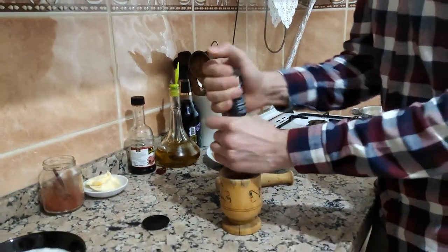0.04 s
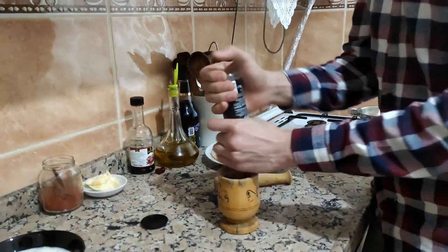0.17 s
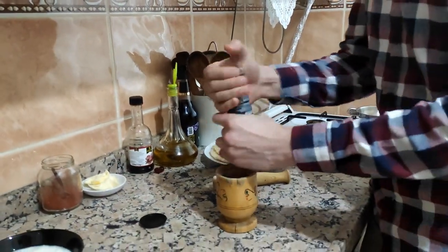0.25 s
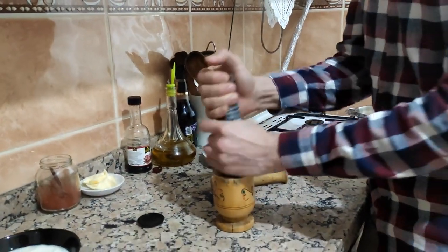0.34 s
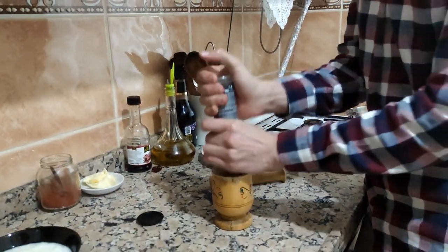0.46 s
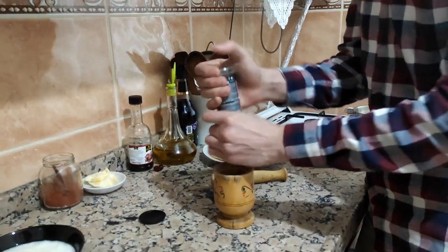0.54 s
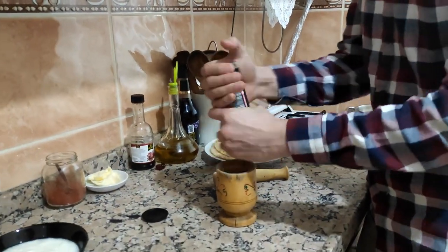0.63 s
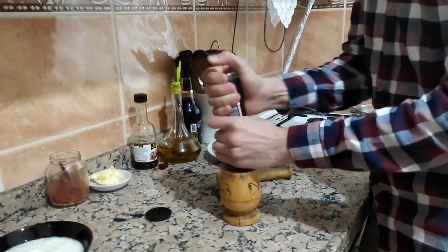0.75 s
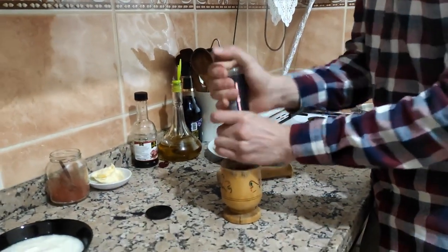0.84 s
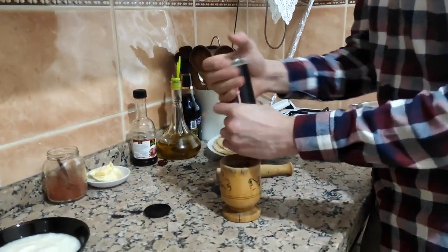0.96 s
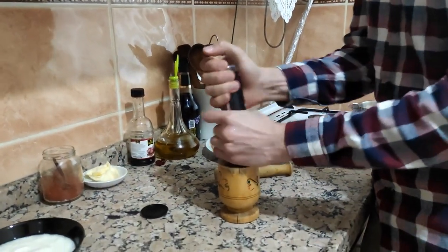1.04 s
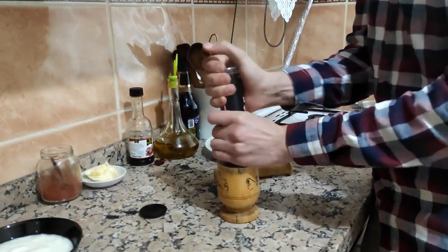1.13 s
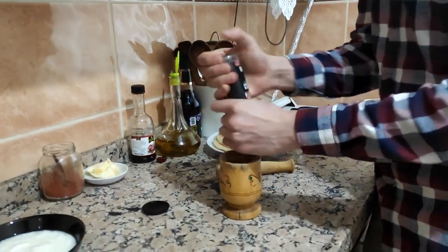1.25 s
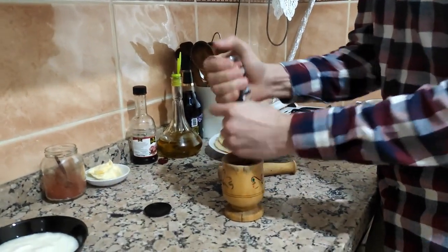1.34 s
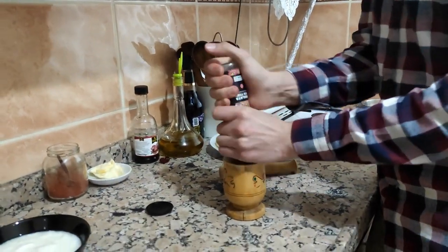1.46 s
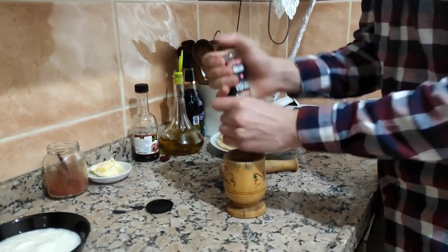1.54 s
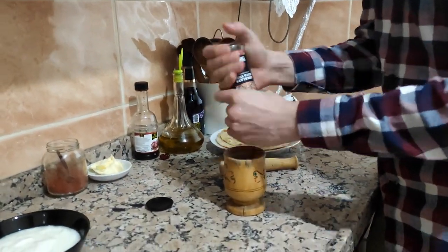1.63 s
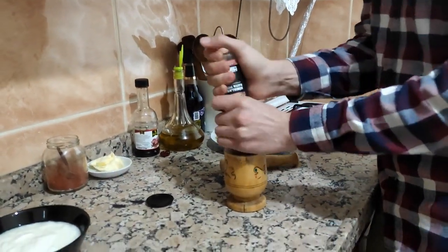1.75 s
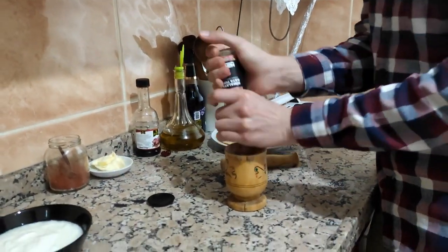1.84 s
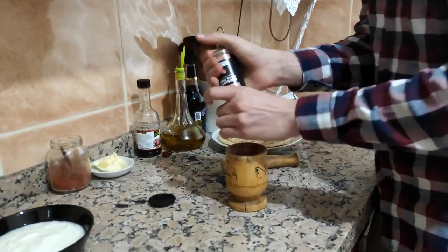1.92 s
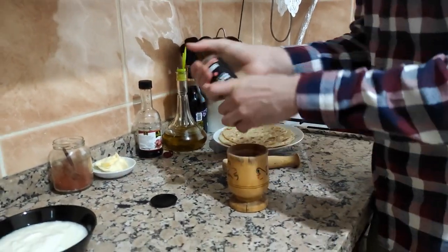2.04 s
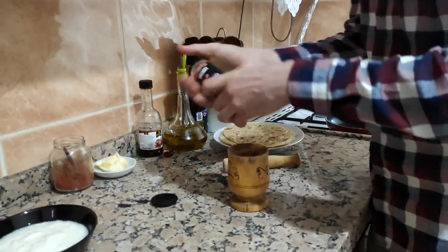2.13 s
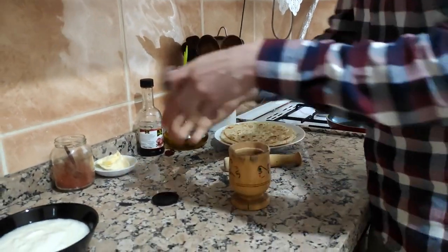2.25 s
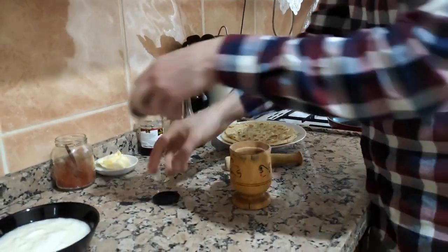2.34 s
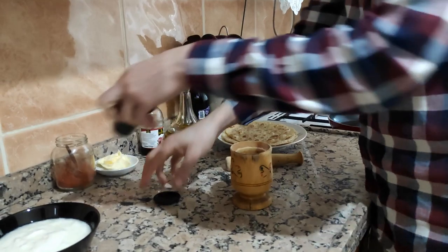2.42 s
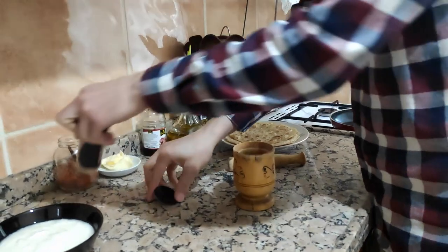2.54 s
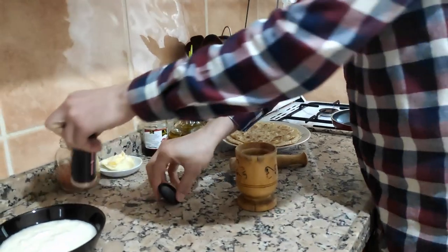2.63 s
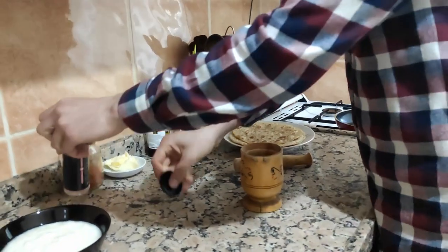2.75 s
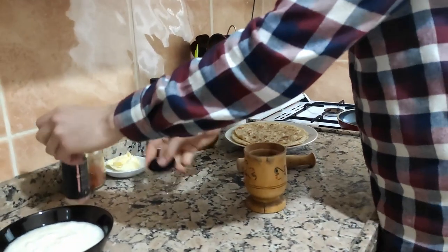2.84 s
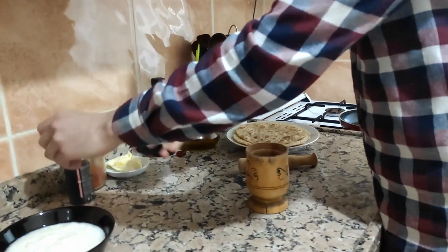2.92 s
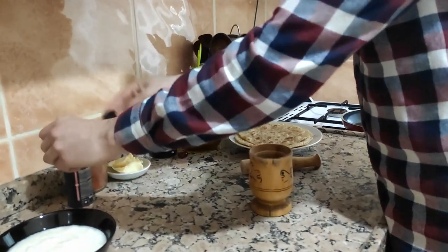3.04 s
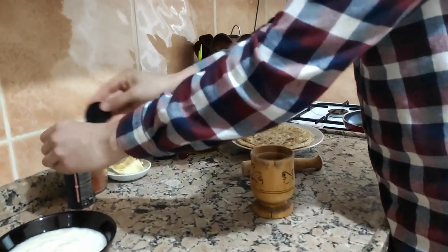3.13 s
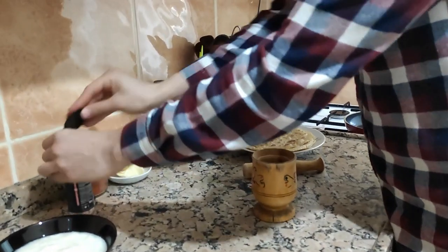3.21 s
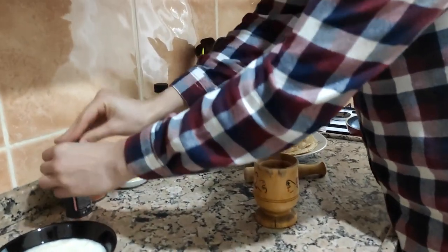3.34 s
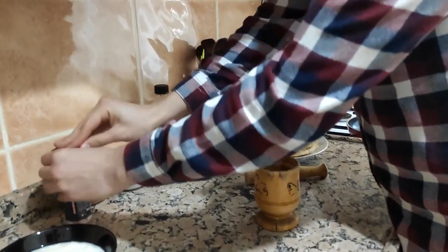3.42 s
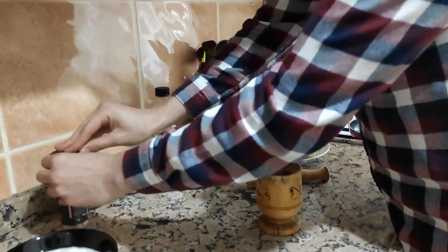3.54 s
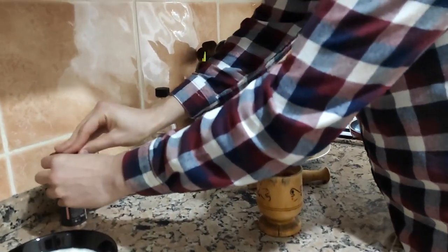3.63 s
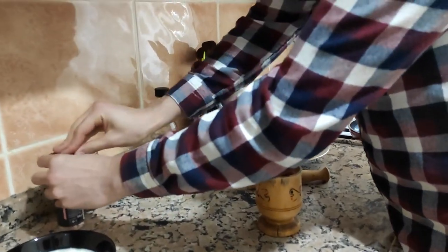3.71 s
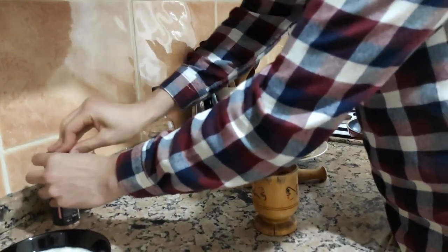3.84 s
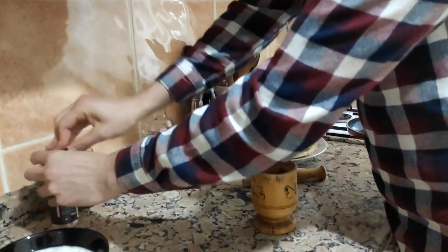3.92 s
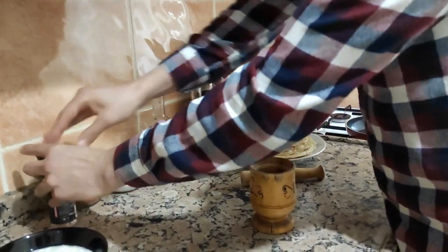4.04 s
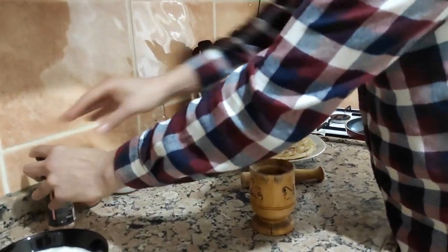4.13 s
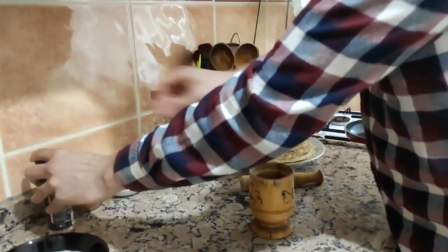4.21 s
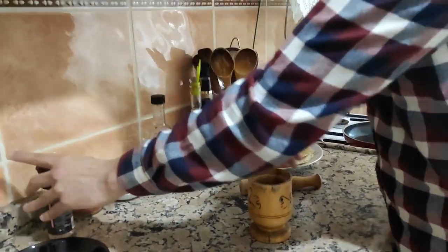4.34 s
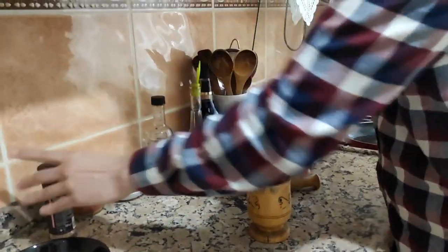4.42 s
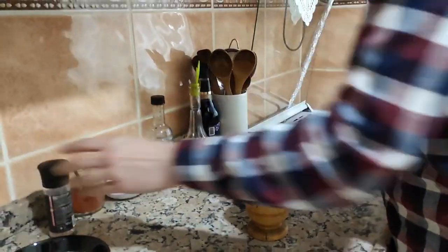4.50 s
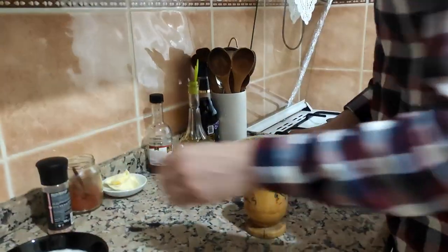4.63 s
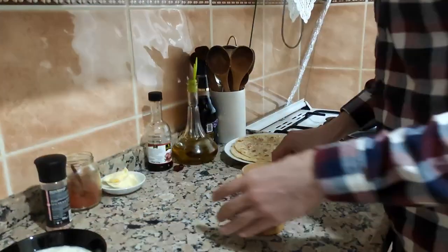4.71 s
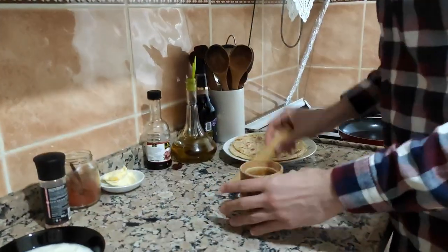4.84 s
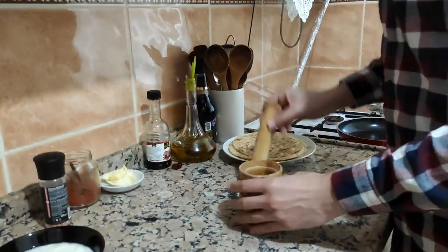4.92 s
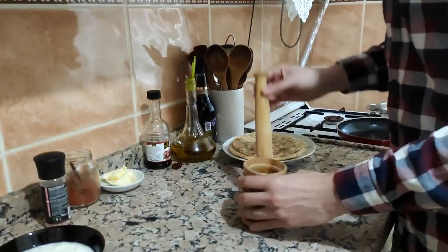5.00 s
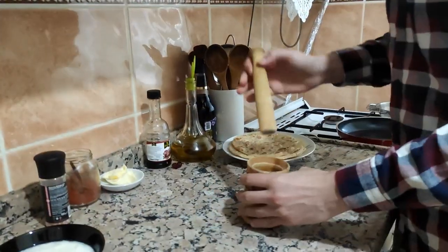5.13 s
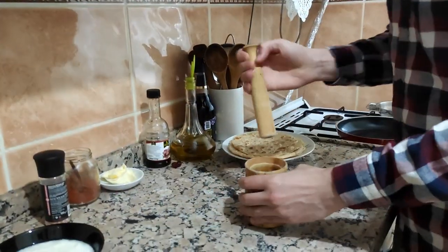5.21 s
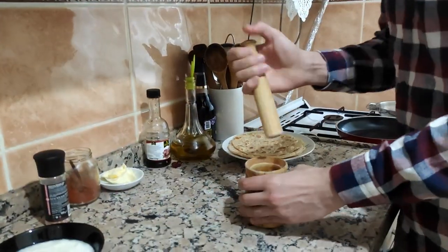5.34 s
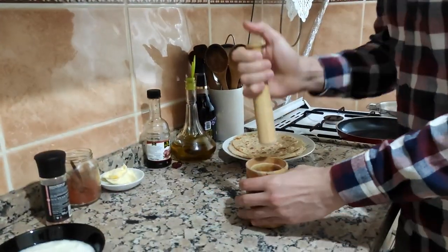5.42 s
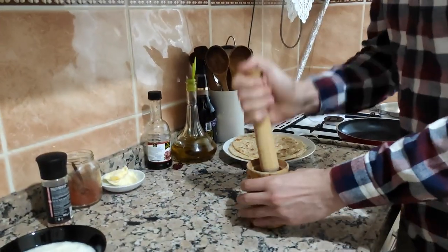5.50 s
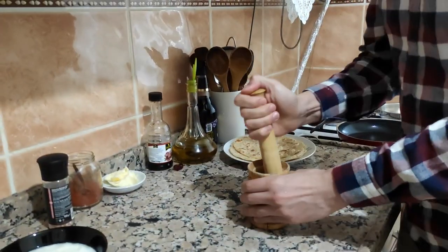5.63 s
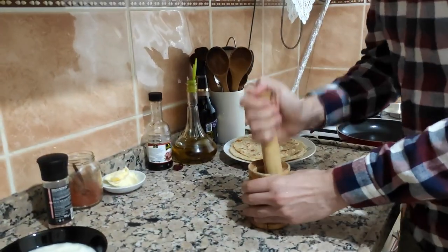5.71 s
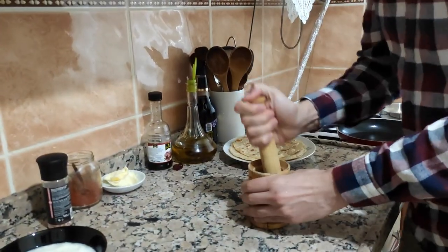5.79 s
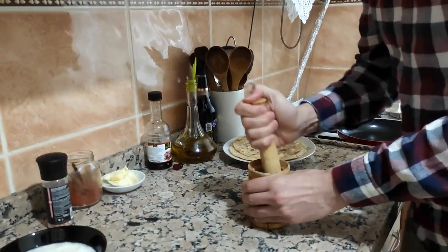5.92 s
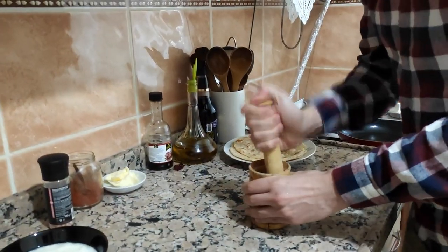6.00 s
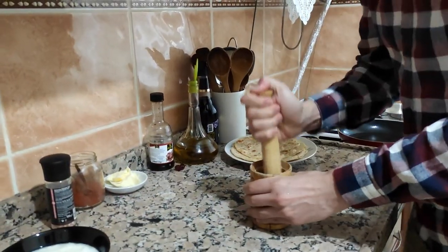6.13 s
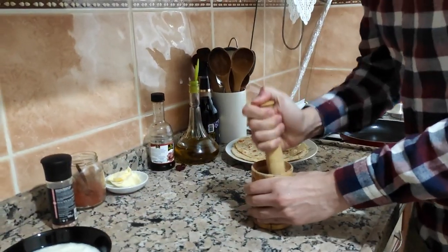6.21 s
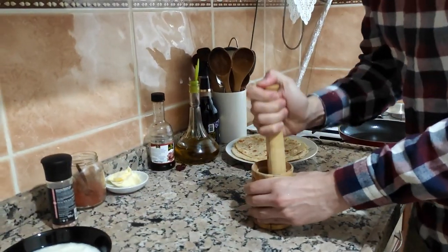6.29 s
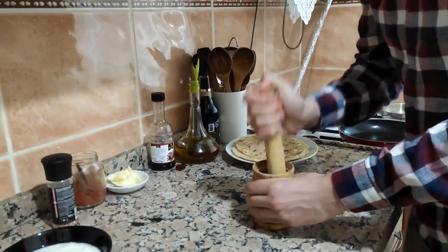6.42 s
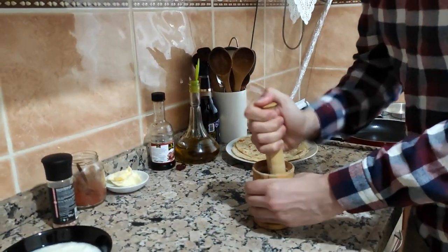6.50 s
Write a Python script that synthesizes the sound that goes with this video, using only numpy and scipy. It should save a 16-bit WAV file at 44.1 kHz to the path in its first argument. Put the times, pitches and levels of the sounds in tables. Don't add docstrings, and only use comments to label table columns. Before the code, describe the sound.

Six short, gritty grinding strokes come at a regular pace, each full of brittle cracks. Sleeve and grains rustle softly, the grinder lands with a hard knock on stone, and a loose cap clatters before being pressed home. After a pause, a wooden pestle bumps the bowl, taps its rim and strikes rapidly with hollow thuds. Close stereo pickup, small hard-walled kitchen, faint low hum.

```python
import sys
import numpy as np
from scipy import signal
from scipy.fft import rfft, irfft
from scipy.io import wavfile
from scipy.ndimage import uniform_filter1d

SR = 44100
rng = np.random.default_rng(int(sys.argv[2]) if len(sys.argv) > 2 else 0)


def boost_factor(decibels):
    exponent = np.asarray(decibels, float) / 20
    return 10 ** exponent


def digitize_waveform(pressure):
    field = np.atleast_2d(pressure).T
    bounded = np.clip(field, -1, 1)
    quanta = np.round(bounded * 32767).astype(np.int16)
    wavfile.write(sys.argv[1], SR, quanta)


N = 289296

# pitch_hz, t60_s
TAIL_DECAY = [(100, 0.24), (500, 0.45), (1500, 0.3), (4000, 0.24), (8000, 0.3), (10000, 0.26),
              (14000, 0.25)]
# pitch_hz, likeness (0 to 1)
STEREO_LIKENESS = [(30, 0.98), (100, 0.032), (300, 0.83), (640, 0.25), (1400, 0.11), (15000, 0.034)]
# pitch_hz, level_db (per Hz)
AIR_COLOUR = [(12, -43.5), (22, -8), (49, -15), (75, -12.5), (130, -7.5), (180, -12.5), (294, -11.5),
              (540, -20.5), (841, -24), (1420, -31), (7510, -37), (8860, -44.5), (13800, -46), (15000, -67)]
# pitch_hz, level_db (rms), phase_rad
HUM_LINES = [(99.8, -56, 0), (101.88, -62, 3.5), (150.4, -60, 1), (200, -74, 2), (250, -72, 4),
             (301, -69, 5)]
# start_s, swell_ms, hold_ms, level_db
GRAIN_SLIDES = [(0.0, 2.2, 140, -63.5), (0.324, 28, 15, -60), (0.677, 16, 56, -59), (1.018, 55, 32, -56),
                (1.369, 38, 42, -57.5), (1.703, 14, 74, -58.5), (2.04, 4.3, 10, -61), (2.17, 53, 21, -58),
                (2.3, 10, 7.8, -67), (2.4, 83, 72, -60), (2.581, 105, 24, -51), (2.74, 13, 41, -70),
                (2.87, 24, 15, -65.5), (3.8, 9.1, 195, -71.5), (4.001, 130, 360, -71),
                (4.681, 14, 34, -75.5), (5.2, 86, 36, -66), (5.49, 27, 46, -70), (5.629, 59, 22, -76),
                (5.8, 29, 13, -59.5)]
# pitch_hz, level_db (per Hz)
RUSTLE_COLOUR = [(880, -59.5), (1500, -29.5), (2310, -13), (3120, -23), (3600, -14), (4500, -19),
                 (5510, -7), (6430, -2.5), (8100, -6.5), (8900, -26), (13800, -19.5), (14300, -13.5),
                 (15000, -54)]
# start_s, bite_ms, hold_ms, crush_level_db, cavity_ring_db (relative)
MILL_TWISTS = [(0.114, 40, 26.5, -43, -3), (0.468, 20.5, 63, -45, 7), (0.811, 57, 26, -42, -2),
               (1.144, 5.8, 72.5, -46, -30), (1.474, 14, 77, -45, 3), (1.781, 6.5, 115, -47, 5)]
# pitch_hz, level_db (per Hz)
CRUSH_COLOUR = [(240, -50), (400, -25), (630, -24), (712, -23.5), (994, -1), (1170, -10), (1270, -4.5),
                (3340, -4.5), (5000, -3), (7400, -6), (8200, -9.5), (8700, -22), (13700, -24), (14300, -17),
                (15000, -68)]
# pitch_hz, width_hz, level_db
MILL_CAVITY = [(996, 70, 9), (1060, 32, 16), (3480, 78, -3)]
# start_s, level_db, treble_db (relative), voice_hz (loudest part)
SEED_SNAPS = [(0.121, -30, -1, 3450), (0.142, -25.5, -5, 1700), (0.16, -24, -18, 3000),
              (0.482, -30, -13, 3250), (0.512, -25, -21, 3600), (0.519, -25, -18, 3960),
              (0.565, -30, -11, 2780), (0.593, -35, -14, 2780), (0.833, -41, -8, 3530),
              (0.8404, -29, -7, 1060), (1.151, -38, -2, 3400), (1.1589, -32, -11, 3500),
              (1.4812, -36, -11, 3180), (1.5175, -27.5, -24, 3450), (1.7916, -31, -13, 1010),
              (1.844, -31, -6, 1000), (1.856, -39, -2, 4040), (0.424, -48, -19, 2190),
              (0.493, -27, -3, 3480), (0.4965, -27, -13, 2200), (0.5352, -25, -8, 2380),
              (0.5513, -21.5, -4.5, 2800), (0.8686, -31, -6, 3370), (0.876, -28, -8, 3300),
              (1.0897, -48, -19, 1770), (1.19, -24.5, -13.5, 3400), (1.443, -33, -13, 910),
              (1.5334, -19.5, 0, 3480), (1.825, -25.5, -9, 1030), (1.9018, -26, -9, 1580),
              (2.163, -40, -15, 1800), (2.245, -45.5, -18, 1130), (2.3137, -43, -1, 3000)]
# start_s, level_db, pitch_hz, t60_s
SMALL_TICKS = [(2.0263, -22, 7370, 0.0054), (3.928, -1, 6330, 0.00072), (4.134, -33, 4220, 0.0032)]
# start_s, swell_ms, hold_ms, level_db
DRAGS = [(6.3, 39, 80, -58.5), (11, 31, 10, -46), (3.468, 12, 3, -45.5), (3.75, 37, 216, -66.5),
         (5.33, 16, 41, -66), (2.45, 80, 110, -74)]
# pitch_hz, level_db (per Hz)
DRAG_COLOUR = [(500, -30), (1000, 4), (2000, -6.5), (3700, -2.5), (5000, -12), (8000, -11.5), (8900, -18),
               (14300, -31), (15000, -60)]

# start_s, level_db, treble_db (relative), thud_db (relative), voice_hz (loudest part)
SET_DOWN_HITS = [
    (3.0528, -12.5, -16, -21.5, 1200),
    (3.0545, -10, -17.5, -20, 2330),
    (3.0575, -9, -12, -29.5, 950),
    (3.061, -16.5, -16.5, -41, 1120),
    (3.15, -26.5, -24.5, -12, 1020),
    (3.161, -31, -22, -6, 1300),
]
CAPPING_HITS = [(3.379, -32, 5, -34, 3000), (3.392, -28, -11.5, -37, 3120), (3.413, -54, -5, -16, 2890),
                (3.485, -19.5, 5, -20.5, 3640), (3.514, -47.5, 1, 3, 2780), (3.574, -64, 16, -30, 6500),
                (3.582, -23, -12, -27, 1520), (3.708, -26.5, 3, -8.5, 1110),
                (3.713, -30.5, -14.5, -9, 2000), (3.721, -29.5, -14, -3.5, 1640),
                (3.727, -34, -20, -12, 2400)]
PRESS_HITS = [
    (4.22, -29, -17.5, -26, 860),
    (4.234, -34, -10, -10, 890),
]
PICK_UP_HITS = [
    (5.045, -44.5, -21, -18, 745),
    (5.297, -38, -51, -31, 754),
    (5.319, -14, -16, -23.5, 820),
]
RIM_TAPS = [
    (5.708, -20.5, -1.5, -41, 1440),
    (5.974, -18.5, 35, -51, 3600),
    (6.098, -14.5, -5, -32, 1640),
    (6.334, -14.5, -3, -18, 3830),
    (6.338, -22.5, -19.5, -27, 1050),
]
POUNDS = [(5.836, -36.5, -21, 12, 990), (5.973, -13, -16, -16, 1060), (5.984, -22.5, -16, -6, 805),
          (6.006, -29.5, -9, -2.5, 420), (6.122, -9, -13.5, -8.5, 1140), (6.286, -8, -7.5, -9, 800),
          (6.316, -36.5, -14, 6, 500), (6.442, -33, -16, -6, 1850), (6.445, -17.5, -13, 0.5, 1050),
          (6.464, -34, -27, 4, 395)]

# crack colour is pitch_hz, level_db (per Hz); both sets of modes are pitch_hz, level_db, t60_s
SEED_BODY = [
    [(290, -57), (500, -15.5), (1050, -12.5), (3050, 5.5), (3510, 4), (4050, -3.5), (13800, -25), (15000, -67)],
    [(303, 0, 0.018)],
    [(950, -3, 0.045), (1051, -1, 0.076), (3450, -14, 0.032)],
]
MILL_BODY = [
    [(70, -49.5), (180, -15), (300, -18.5), (577, -20.5), (800, -15), (1110, -12), (1420, -15.5), (2300, -10), (4100, -18.5), (6200, -28.5), (6730, -37), (8000, -27.5), (8800, -40.5), (14300, -56.5), (15000, -76)],
    [(87.4, -3, 0.17), (140, 4.5, 0.066), (196, -2, 0.09), (290.3, -5.5, 0.094), (408.6, 5.5, 0.25)],
    [(820, 0.5, 0.058), (1068, 6, 0.3), (1360, -3.5, 0.11), (1610, 6, 0.16), (2256, 3.5, 0.24), (2500, -2, 0.18), (3278, -8, 0.2), (3540, -8.5, 0.2), (4200, -11, 0.13), (5240, -12, 0.073)],
]
CAP_BODY = [
    [(70, -33), (180, -5), (300, -9), (597, -7.5), (840, -2.5), (1620, -5.5), (2040, -4), (3490, -16.5), (4540, -24), (8000, -23.5), (8800, -39), (14000, -39.5), (15000, -82)],
    [(86.6, -19, 0.096), (191.7, 3.5, 0.13), (303, -5, 0.21), (373, 5.5, 0.079)],
    [(617, -26, 0.2), (830, -7, 0.061), (890, -1, 0.15), (1030, -13, 0.12), (1086, 14, 0.033), (1606, 18, 0.021), (3000, -19, 0.15)],
]
SEATED_CAP_BODY = [
    [(120, -37), (400, -18.5), (800, -7), (1620, -6.5), (2500, -13), (3490, -23), (4540, -19), (8000, -32), (8800, -34), (15000, -68)],
    [(303, -5, 0.085), (370, 1, .08)],
    [(586, -5, 0.22), (740, -6, 0.14), (880, 1, 0.17), (1010, -6, .11), (1370, -4, .08), (1807, -13, 0.15), (1993, -12, .2), (2172, -10.5, 0.14), (2466, -18, .25)],
]
NUDGED_BOWL_BODY = [
    [(180, -30), (300, -28), (763, -10.5), (1200, -5.5), (1500, -14.5), (2400, -16.5), (3120, -29.5), (3800, -18), (4600, -36), (5500, -23.5), (7420, -18), (10500, -43.5), (12700, -64), (14000, -42), (15000, -90)],
    [(218, -2, 0.14), (262.6, 0.73, 0.7)],
    [(523, 9, 0.1), (767, 10, 0.15), (835, -9, 0.072), (1020, -6, 0.13), (1064, 20, 0.13), (1305, 0, 0.14), (1640, 5, 0.21), (2270, -20.5, 0.2), (3600, -19, 0.14), (4280, -22, 0.15)],
]
RIM_BODY = [
    [(240, -63), (400, -8), (576, 2), (1660, 4.5), (2220, -4), (4330, -7), (4670, -13), (7700, -19), (8960, -37), (13700, -39), (15000, -72)],
    [(295, 7, 0.085), (378, -25, .06)],
    [(815, -6, 0.091), (1091, 29.5, 0.073), (1563, 20.5, 0.059), (2700, 3, 0.042), (3500, 9, 0.16), (3700, -7, 0.056), (4340, -27, 0.037)],
]
MORTAR_BODY = [
    [(180, -52), (300, -7), (637, -16), (788, -8.5), (1420, -10.5), (1670, -9.5), (2690, -9.5), (3270, -26), (4320, -17), (8100, -18.5), (8800, -31.5), (14000, -35), (15000, -71)],
    [(54.3, -27, .12), (86.3, 1, 0.068), (155, -4, 0.16), (201.8, 3.5, 0.23), (179, -2, 0.1), (242, -2.5, 0.15), (285.4, -5.5, 0.69), (358, -5, 0.24), (432, -7, 0.25), (490, -18, 0.08)],
    [(520, -3, 0.065), (565, -2, 0.069), (745.4, 8.5, 0.14), (820, 7, 0.075), (1104, 5, 0.26), (1291, 3.5, 0.19), (1470, -9, 0.091), (1640, 0, 0.085), (1810, 1, 0.12), (2190, -9, 0.079), (2500, -16, 0.25), (2660, -10, 0.15), (3500, -15, 0.17)],
]

MILL_PAN_DB, BOWL_PAN_DB = 1.5, 0.3


def evened(x):
    return x / np.sqrt(np.mean(x ** 2) + 1e-20)


def peaked(x):
    return x / abs(x).max()


def panned(x, pan_db):
    return x * boost_factor(np.array([[pan_db / 2], [-pan_db / 2]]))


def read(points, hz):
    f, value = np.transpose(points)
    return np.interp(np.log(hz + 1), np.log(f + 1), value)


def add(mix, s, sound):
    part = mix[..., round(s * SR):][..., :sound.shape[-1]]
    part += sound[..., :part.shape[-1]]


def coloured(x, points):
    hz = np.fft.rfftfreq(x.shape[-1], 1 / SR)
    return evened(irfft(rfft(x) * boost_factor(read(points, hz)), x.shape[-1]))


def grains(per_s, spread_db, bed):
    size_db = spread_db * np.minimum(rng.exponential(1, N), 3)
    cracks = boost_factor(size_db) * (rng.random(N) < per_s / SR) * rng.standard_normal(N)
    return evened(cracks) + bed * rng.standard_normal(N)


def stroke(s, rise_ms, hold_ms, db, catch_db, sag_db, fade_db_per_s):
    catch_ms, onset_db = 1.8, -10
    steps = np.cumsum([0, catch_ms / 1000, rise_ms / 1000, hold_ms / 1000, 60 / fade_db_per_s])
    shape_db = [onset_db, catch_db, 0, sag_db, sag_db - 57.5]
    return boost_factor(db + np.interp(np.arange(N) / SR - s, steps, shape_db, -200, -200))


def drag_gain(rows):
    return sum(stroke(*row, catch_db=-14, sag_db=-3, fade_db_per_s=400) for row in rows)


def room(x, wet_db, near_db, lag_ms):
    sparse = rng.random((2, SR // 2)) < .15
    hz, t, z = signal.stft(rng.standard_normal((2, SR // 2)) * sparse, SR, nperseg=256)
    same = np.clip(read(STEREO_LIKENESS, hz) * 1.26, 0, 1)[:, None]
    z[1] = same * z[0] + np.sqrt(1 - same ** 2) * z[1]
    weak_bass = boost_factor(read([(100, -4.5), (400, 4.0), (800, -9.0)], hz))[:, None]
    decay = boost_factor(-60 * t / read(TAIL_DECAY, hz)[:, None])
    tail = signal.istft(z * weak_bass * decay, SR, nperseg=256)[1]
    t = np.arange(tail.shape[1]) / SR
    near_burst = 1 + boost_factor(near_db) * np.exp(-t / 0.0046)
    tail *= np.minimum(t / 0.00035, 1) * near_burst
    tail *= boost_factor(wet_db) / np.linalg.norm(tail[0])
    tail[0, round(lag_ms * SR / 1000)] += 1
    tail[1, 0] += 1
    out = np.zeros((2, N))
    heard = np.flatnonzero(abs(x) > 1e-9)
    first, last = heard[0], heard[-1]
    add(out, first / SR, signal.fftconvolve(x[None, first:last + 1], tail, axes=1))
    return out


def causal(gain_db):
    both_sides = np.concatenate([gain_db, gain_db[-2:0:-1]])
    log_gain = np.log(boost_factor(np.maximum(both_sides, -100)))
    return np.fft.ifft(np.exp(log_gain - 1j * signal.hilbert(log_gain).imag)).real[:1024]


def ringing(modes, spread=1, climb_per_s=0):
    t = np.arange(9000) / SR
    hz, db, t60 = np.transpose(modes)[:, :, None]
    favour, detune = spread * rng.standard_normal((2, len(modes), 1))
    gain = boost_factor(db + 2 * favour - 60 * t / t60)
    pitch = hz * (1 + 0.0098 * detune)
    return (gain * np.sin(2 * np.pi * pitch * t * (1 + climb_per_s * t / 2))).sum(0)


def contact_clump(contact_ms, lead):
    ms = np.arange(2000) / SR * 1000
    clump = rng.standard_normal(2000) * np.exp(-ms / contact_ms) * np.minimum(3 * ms / contact_ms, 1)
    clump /= np.linalg.norm(clump)
    clump[0] = lead
    return clump


def blows(rows, body, hardest_ms, usual_db, lead, ring_db, wet_db, near_db, lag_ms):
    turns, thuds = np.zeros((2, N)), np.zeros(N)
    t, hz = np.arange(9000) / SR, np.fft.rfftfreq(2048, 1 / SR)
    bloom = 1 - 0.5 * np.exp(-t / 0.014)
    bloom *= .05 + .95 / (1 + np.exp((t - .052) / 0.011))
    push = np.diff(signal.windows.hann(round(0.0041 * SR)))
    colour, thud, modes = body
    strongest_db = max(row[1] for row in rows)
    for k, (s, db, treble_db, thud_db, voice_hz) in enumerate(rows):
        contact_ms = hardest_ms * boost_factor(0.52 * (strongest_db - db))
        clump = contact_clump(contact_ms, lead)
        ripple_db = 15 * np.log10(uniform_filter1d(abs(rfft(clump, 2048)), size=5))
        ripple_db = np.clip(ripple_db, -12, 12)
        tilt_db = (treble_db - usual_db) * np.clip(np.log2(hz / 1600 + 1e-9), 0, 1)
        voice_db = 6 * np.exp(-(np.log2(hz / voice_hz + 1e-9) / 0.3) ** 2)
        voice_db -= 5 * np.clip(np.log2(voice_hz / (hz + 1)) - .7, 0, 4)
        sound = boost_factor(ring_db) * peaked(np.diff(ringing(modes)))
        crack = causal(read(colour, hz) + tilt_db + voice_db - ripple_db)
        add(sound, 0, peaked(crack))
        add(turns[k % 2], s, boost_factor(db) * peaked(signal.fftconvolve(clump, sound)))
        swing = bloom * ringing(thud, spread=.5, climb_per_s=.4)
        add(thuds, s, boost_factor(db + thud_db) * peaked(signal.fftconvolve(push, swing)))
    carried = panned(room(thuds, wet_db=-16, near_db=2.5, lag_ms=0.5), -2.5)
    return carried + sum(room(x, wet_db, near_db, lag_ms) for x in turns)


def air():
    frames, hz = N // 512 + 5, np.fft.rfftfreq(2048, 1 / SR)
    a, b, c, d, patches = rng.standard_normal((frames, 1025, 5)).T
    patches = uniform_filter1d(patches, size=20, axis=0)
    patches = evened(uniform_filter1d(patches, size=8, axis=1))
    same = np.clip(read(STEREO_LIKENESS, hz), -1, 1)[:, None]
    left = a + 1j * b
    right = same * left + np.sqrt(1 - same ** 2) * (c + 1j * d)
    z = np.array([left, right]) * boost_factor(read(AIR_COLOUR, hz)[:, None] + 2 * patches)
    tone = boost_factor(-58) * evened(signal.istft(z, nperseg=2048, noverlap=1536)[1][:, :N])
    t = np.arange(N) / SR
    side_rad = np.array([[.35], [-.35]])
    for line_hz, db, phase in HUM_LINES:
        waver_db = 0.5 * evened(uniform_filter1d(rng.standard_normal(N), size=9000))
        line = np.sin(2 * np.pi * line_hz * t + phase + side_rad)
        tone = tone + np.sqrt(2) * boost_factor(db + waver_db) * line
    return tone


def sliding():
    rustle = coloured(grains(per_s=2600, spread_db=3.3, bed=1.2), RUSTLE_COLOUR)
    wet = room(drag_gain(GRAIN_SLIDES) * rustle, wet_db=4.2, near_db=13.0, lag_ms=.3)
    return panned(boost_factor(-1.5) * wet, MILL_PAN_DB)


def mill():
    judder = evened(uniform_filter1d(rng.standard_normal(N), size=260))
    cracks = grains(per_s=2400, spread_db=5, bed=0.39) * boost_factor(2.5 * judder)
    hollow = np.zeros(N)
    for hz, width_hz, db in MILL_CAVITY:
        b, a = signal.iirpeak(hz, hz / width_hz, SR)
        hollow += boost_factor(db) * evened(signal.lfilter(b, a, cracks))
    hollow = evened(hollow)
    grit, dry = coloured(cracks, CRUSH_COLOUR), np.zeros(N)
    for *twist, ring_db in MILL_TWISTS:
        gain = stroke(*twist, catch_db=-12, sag_db=-5, fade_db_per_s=439)
        dry += gain * (grit + boost_factor(ring_db - 17) * hollow)
    return panned(boost_factor(0.5) * room(dry, wet_db=2, near_db=7.7, lag_ms=0.27), MILL_PAN_DB)


def cracking_seeds():
    rows = [(s, db, treble_db, -63, hz) for s, db, treble_db, hz in SEED_SNAPS]
    hits = blows(rows, SEED_BODY, hardest_ms=0.29, usual_db=-0.32, lead=1.5, ring_db=-24,
                 wet_db=-2, near_db=4.4, lag_ms=0.19)
    return panned(hits, MILL_PAN_DB)


def ticks():
    out, t = np.zeros(N), np.arange(600) / SR
    for s, db, hz, t60 in SMALL_TICKS:
        ring = np.sin(2 * np.pi * hz * t) * np.minimum(t / 0.0011, 1)
        add(out, s, boost_factor(db - 60 * t / t60) * ring)
    return room(out, wet_db=-7, near_db=6.0, lag_ms=.1)


def scraping():
    rasp = coloured(grains(per_s=1500, spread_db=4.5, bed=.8), DRAG_COLOUR)
    return room(drag_gain(DRAGS) * rasp, wet_db=9.0, near_db=8.5, lag_ms=0.2)


def setting_down():
    return blows(SET_DOWN_HITS, MILL_BODY, hardest_ms=2.3, usual_db=-12.0, lead=0.046, ring_db=-18.5,
                 wet_db=4.5, near_db=6.2, lag_ms=0.23)


def capping():
    cap = blows(CAPPING_HITS, CAP_BODY, hardest_ms=3.8, usual_db=-14.0, lead=0.55, ring_db=-14.5,
                wet_db=6.67, near_db=8.5, lag_ms=.3)
    cap += blows(PRESS_HITS, SEATED_CAP_BODY, hardest_ms=3.4, usual_db=-15, lead=0.63, ring_db=-9.5,
                 wet_db=4.7, near_db=3.3, lag_ms=0.35)
    return panned(cap, 0.7)


def picking_up_pestle():
    hits = blows(PICK_UP_HITS, NUDGED_BOWL_BODY, hardest_ms=3.6, usual_db=-15.0, lead=0.79, ring_db=-11.5,
                 wet_db=4.74, near_db=7.9, lag_ms=0.26)
    return panned(hits, BOWL_PAN_DB)


def tapping_rim():
    hits = blows(RIM_TAPS, RIM_BODY, hardest_ms=2.46, usual_db=-5.0, lead=0.45, ring_db=-15.0,
                 wet_db=0, near_db=8.6, lag_ms=0.24)
    return panned(hits, BOWL_PAN_DB)


def pounding():
    hits = blows(POUNDS, MORTAR_BODY, hardest_ms=1.94, usual_db=-6.5, lead=1.1, ring_db=-10.5,
                 wet_db=4.1, near_db=4.2, lag_ms=0.24)
    return panned(hits, BOWL_PAN_DB)


def scene():
    mix = air() + sliding() + mill() + cracking_seeds()
    mix += ticks() + scraping() + setting_down() + capping()
    return mix + picking_up_pestle() + tapping_rim() + pounding()


def low_pass(x):
    return signal.sosfilt(signal.butter(12, 15470, fs=SR, output="sos"), x)


def record(dry):
    edges_hz = [0, 8000, 8900, 14250, 14650, SR / 2]
    shelf = signal.firwin2(255, edges_hz, boost_factor(np.array([0, 0, 0, 0, -55, -70])), fs=SR)
    return low_pass(signal.oaconvolve(dry, shelf[None], "same"))


dry = scene()
out = record(dry)
digitize_waveform(out)
```